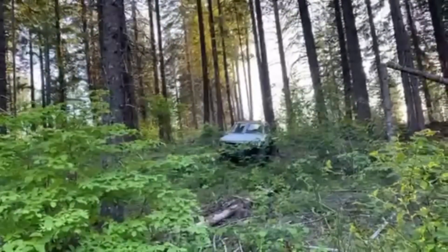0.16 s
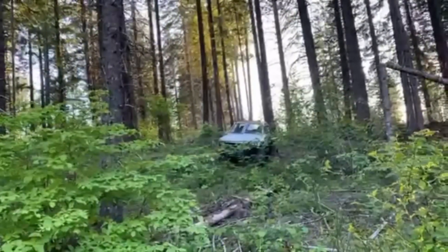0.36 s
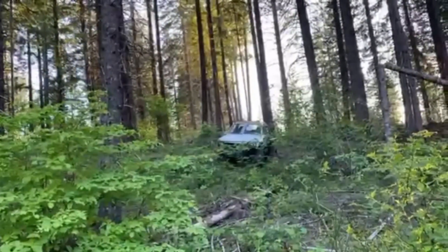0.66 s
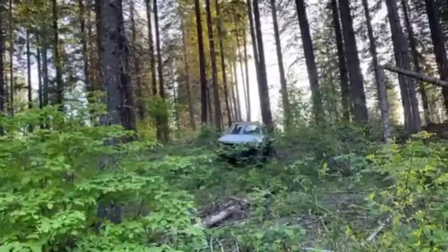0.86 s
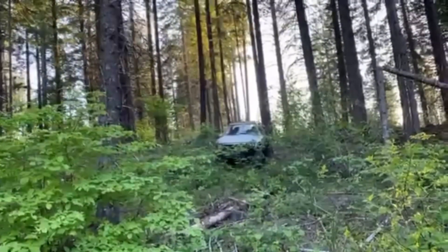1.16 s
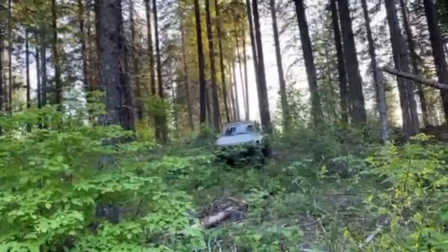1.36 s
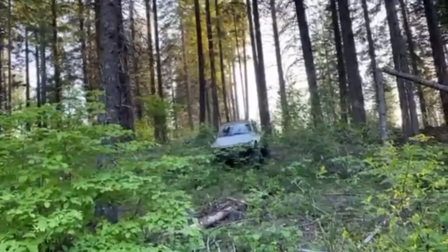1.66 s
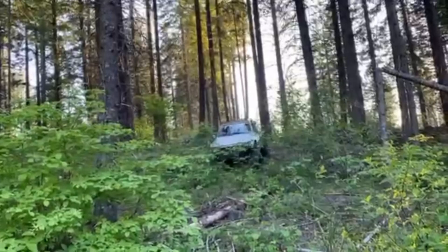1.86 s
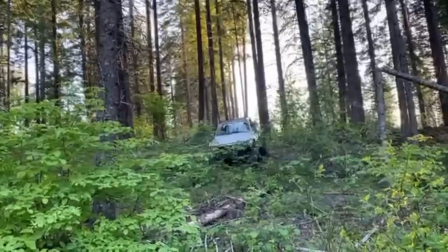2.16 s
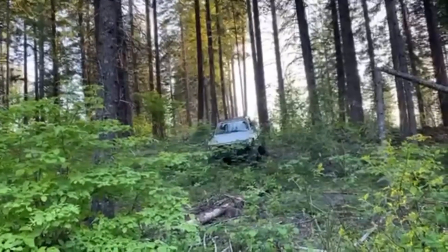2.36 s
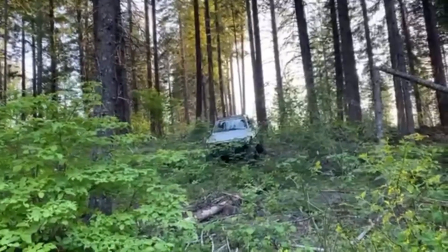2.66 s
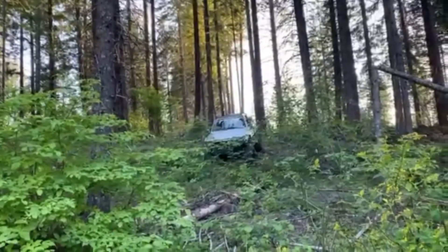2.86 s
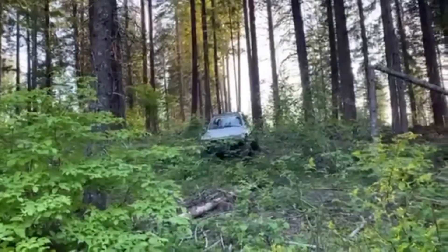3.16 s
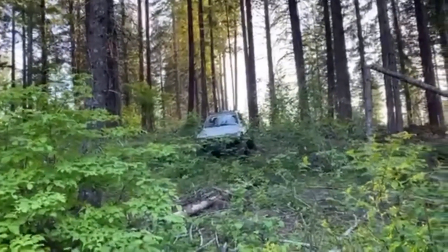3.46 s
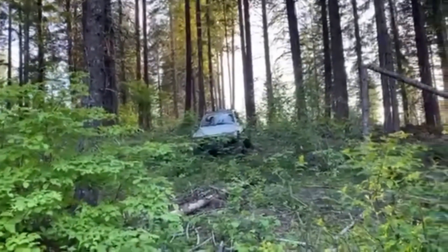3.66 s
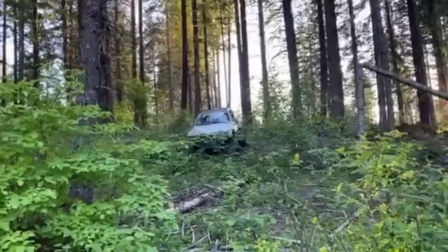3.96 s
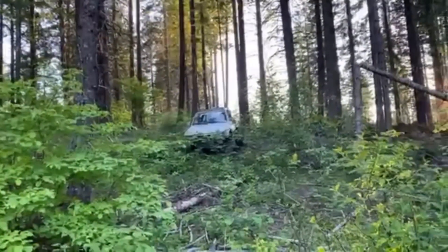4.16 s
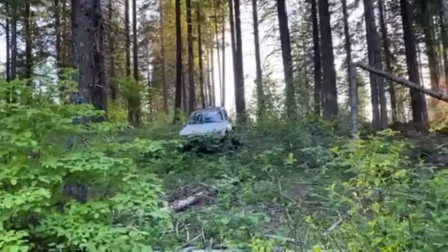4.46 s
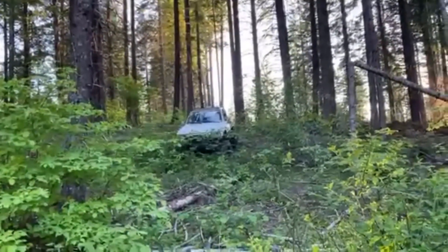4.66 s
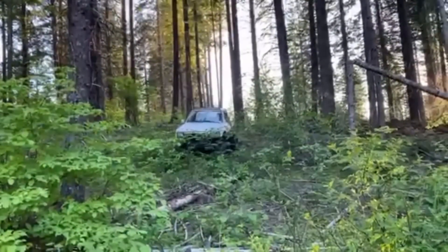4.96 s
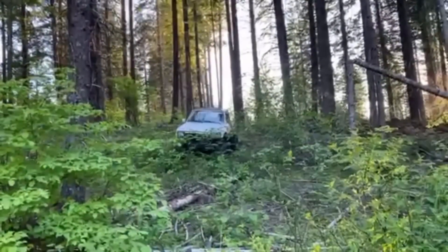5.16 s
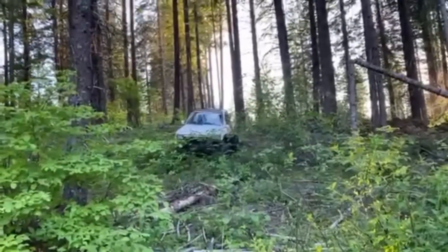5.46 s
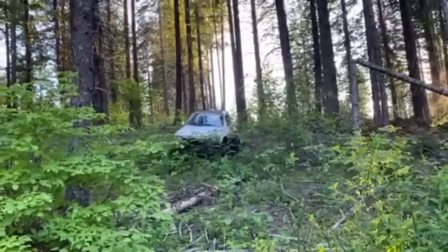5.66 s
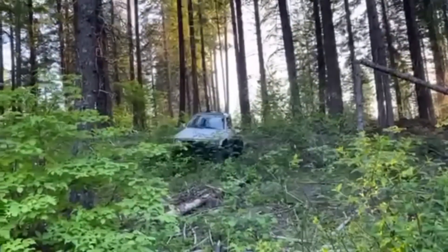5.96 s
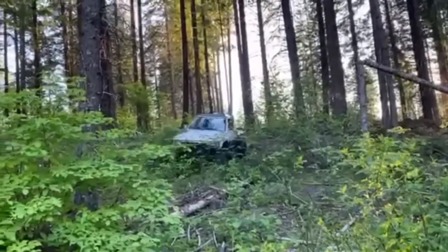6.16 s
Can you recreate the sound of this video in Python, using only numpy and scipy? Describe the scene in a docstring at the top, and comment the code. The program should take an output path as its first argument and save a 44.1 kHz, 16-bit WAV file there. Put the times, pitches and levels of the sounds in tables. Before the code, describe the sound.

Two engines throb in a forest, one revving in bursts, while branches snap and leaves swish under a slowly crawling off-road vehicle.

```python
"""Two engines throb in a conifer forest: a four-cylinder off-roader idles, then revs three times as it
crawls over brush, while a second engine hunts at low speed nearby. Each is a train of firing pulses
filtered by a resonant exhaust, over mechanical clatter and an airy hiss that pulse with the firings.
Under the tyres twigs crackle, branches snap and logs knock: brief impulses that excite the wood.
The trunks scatter it all into a thin reverberation."""
import sys
import numpy as np
from scipy import signal
from scipy.fft import rfft, irfft, next_fast_len
from scipy.io import wavfile
from scipy.ndimage import map_coordinates

SR = 44100
rng = np.random.default_rng(int(sys.argv[2]) if len(sys.argv) > 2 else 0)


def put_to_file(sound):
    """Save the sound as 16-bit audio at rate SR, in the file named by the first command-line argument."""
    columns = np.atleast_2d(sound).T  # one column per channel
    safe = np.clip(columns, -1, 1)
    whole_steps = np.round(safe * 32767)
    wavfile.write(sys.argv[1], SR, whole_steps.astype(np.int16))


N = 277461
TIME = np.arange(N) / SR
TOP_HZ = 15500
REV_CRUISE_HZ, SLOW_CRUISE_HZ = 70, 45  # firing rates at which the base levels hold
LOAD, VOICE, RUSH = 0, 1, 2  # effects of a throttle press: load, bark or growl, rush


# speed of the off-roader's engine: (time [s], firing rate [Hz])
REV_SPEED = [(0, 64.1), (2.37, 64.02), (2.5, 81.3), (2.59, 85.4), (3.13, 70.53), (3.59, 69.6),
             (3.72, 83.95), (3.858, 95.7), (4.03, 83.8), (4.31, 60.27), (4.69, 78.36), (4.92, 82.8),
             (5.15, 83.9), (5.36, 81.46), (5.671, 68.95), (5.82, 66), (5.922, 67.97), (6.102, 58.9)]
# its throttle: (time [s], held [s], load [1 = firm], added bark [dB], added rush [dB])
PRESSES = [(2.36, 0.17, 0.83, 13, 19), (3.61, 0.15, 1.05, 15.5, 20), (4.041, .17, .55, 3, 0),
           (4.348, .34, 0.88, 11.5, 19.5), (4.57, 1.06, 1.12, 14.5, 21.5), (5.66, .22, 1.56, 11.5, 17.5)]
# exhaust response for its round note, off throttle: (frequency [Hz], level [dB])
NOTE = [(58, -27.5), (64, -26.5), (68, -22.5), (78, -17.5), (84, -16), (95, -14.5), (118, -27.5),
        (128, -28), (145, -25.5), (166, -31), (182, -37)]
# exhaust response for its bark: (frequency [Hz], relative level [dB])
BARK = [(180, 15), (245, -0.5), (330, 3), (415, 7), (500, -6), (585, -9), (700, -1), (830, -1.5),
        (1000, -13.5), (1500, -44)]

def revving_engine():
    """Forced vibration: firings drive the exhaust pipe, and load lifts the upper harmonics to a bark."""
    hz, = curves(REV_SPEED)
    phase = crank(hz)
    load = throttle(PRESSES, LOAD, attack_s=0.051, release_s=0.088)
    first = response(NOTE, hz) * undb(6.5 * load)
    second = response(NOTE, 2 * hz) * undb(2 * load)
    note = np.sqrt(2) * (first * np.sin(2 * np.pi * phase) + second * np.sin(4 * np.pi * phase))
    # unequal cylinders add faint sidebands between the harmonics
    imbalance = np.sin(np.pi * phase / 2) + 0.15 * np.sin(np.pi * phase)
    push_db = throttle(PRESSES, VOICE, attack_s=0.028, release_s=0.073)
    bark_db = -46.5 - 0.0316 * (hz - REV_CRUISE_HZ) + push_db
    bark = undb(bark_db) * harmonics(phase, hz, BARK, scatter=0.17, evenness=0.94, first=3, count=14)
    note *= 1 + 0.025 * imbalance + 0.055 * walk(40)
    bark *= 1 + 0.027 * imbalance + 0.15 * walk(70)
    return note + bark, phase


# speed of the slow engine: (time [s], firing rate [Hz])
SLOW_SPEED = [(0, 30.3), (0.119, 30.35), (.4, 45.12), (.7, 48.45), (0.858, 41.4), (1.059, 42.35),
              (1.19, 29.98), (1.41, 27.38), (1.5, 39.07), (1.629, 50.5), (1.82, 55.42), (2.2, 53.8),
              (2.949, 44.8), (3.139, 50.55), (3.4, 45.68), (3.651, 36.48), (4.03, 32), (4.25, 41.9),
              (4.42, 34.8), (6.29, 34.01)]
# swell of its boom and mechanical noise: (time [s], gain [dB])
SLOW_LEVEL = [(0, -5.5), (.78, 0), (1.24, 2), (1.52, 0), (2.15, 2.5), (3.05, 0), (3.38, -1), (3.85, -7.5),
              (4.25, -2.5), (4.8, -5.5), (5.85, -13), (6.29, -6)]
# its throttle: (time [s], held [s], load [1 = firm], added growl [dB])
DABS = [(.19, 0.091, 1.17, 10.5), (.87, 0.18, 0.55, 14), (1.43, 0.2, 0.68, 11.5), (2.45, .4, 0.04, 3.5),
        (2.97, 0.084, 0.37, 8), (3.15, 0.29, 0.026, 6), (4.2, .12, 0.7, 1), (5.45, 0.89, 1.08, 1)]
# response of its silencer: (frequency [Hz], relative level [dB])
BOOM = [(28, -24), (42, -10), (48, -7.5), (56, 10), (80, -5.5), (100, -9.5), (116, 0), (135, -11.5),
        (165, -21.5), (210, -64)]
# response of its pipe: (frequency [Hz], relative level [dB])
GROWL = [(120, -52), (165, -7.5), (208, 6.5), (238, 0), (280, -20.5), (330, -20), (400, -21.5), (600, -10),
         (900, -22.5)]

def slow_engine():
    """Resonance: harmonics boom as they cross the silencer's peaks; the pipe growls under throttle."""
    hz, = curves(SLOW_SPEED)
    level_db, = curves(SLOW_LEVEL)
    phase = crank(hz)
    boom_db = -22.5 + level_db + 8 * throttle(DABS, LOAD, attack_s=0.018, release_s=0.054)
    push_db = throttle(DABS, VOICE, attack_s=0.038, release_s=0.072)
    growl_db = -43 + 0.16 * (hz - SLOW_CRUISE_HZ) + push_db
    boom = undb(boom_db) * harmonics(phase, hz, BOOM, scatter=0.21, evenness=0.46, first=1, count=6)
    growl = undb(growl_db) * harmonics(phase, hz, GROWL, scatter=0.29, evenness=1, first=3, count=16)
    return boom * undb(0.24 * walk(35)) + growl * undb(2.85 * walk(45)), phase


# spectrum of the dull clatter: (frequency [Hz], relative density [dB])
CLATTER = [(150, 1.5), (300, -5), (440, -2), (560, 2.5), (740, 3), (950, -4), (1250, -11), (1450, -13),
           (2500, -32.5), (6000, -29)]
# spectrum of the bright rattle: (frequency [Hz], relative density [dB])
RATTLE = [(900, -15), (1250, 3.5), (1480, -6), (1800, 0.5), (2020, -8), (2380, 3.5), (2650, -17),
          (3500, -14.5), (4600, -8), (7000, -33)]

def running_gear(rev_phase, slow_phase):
    """Amplitude modulation: the noise of gas and valves pulses in step with the firings."""
    both = pulsation(rev_phase, sharpness=0.22) * pulsation(slow_phase, sharpness=0.12)
    slow = pulsation(slow_phase, sharpness=0.21)
    clatter = colour(rng.standard_normal(N) * both * undb(1.2 * walk(30)), CLATTER)
    rattle = colour(rng.standard_normal(N) * slow * undb(2.5 * walk(50)), RATTLE)
    clatter *= effort(rev_law=(-42, 0.21, 6.9), slow_law=(-42.5, 0.25, 0.83))
    rattle *= effort(rev_law=(-60.5, 0.57, 4), slow_law=(-49, 0.19, 3))
    return clatter + rattle


def effort(rev_law, slow_law):
    """Incoherent sources add in power; each engine's noise grows with its speed and load."""
    def gain(speed, cruise_hz, presses, base_db, db_per_hz, load_db):
        hz, = curves(speed)
        load = throttle(presses, LOAD, attack_s=0.3, release_s=0.2)
        return undb(base_db + db_per_hz * (hz - cruise_hz) + load_db * load)
    level_db, = curves(SLOW_LEVEL)
    return np.hypot(gain(REV_SPEED, REV_CRUISE_HZ, PRESSES, *rev_law),
                    gain(SLOW_SPEED, SLOW_CRUISE_HZ, DABS, *slow_law) * undb(level_db))


# leaves brushing the body: (time [s], level [dB])
BRUSHING = [(0, -62), (.72, -54), (.95, -48), (1.45, -46), (1.9, -49.5), (2.35, -46.5), (3.0, -54.5),
            (4.25, -52.5), (5.4, -43), (5.9, -43.5), (6.29, -48)]
# spectrum of the hiss: (frequency [Hz], relative density [dB])
HISS = [(300, 12.5), (1300, 3.5), (2000, 2.5), (2900, 3.5), (4000, 5.5), (4900, 3.5), (5600, -3.5),
        (6300, 3), (7600, 3.5), (11000, -1.5), (15000, -10), (16000, -26)]

def hiss(rev_phase):
    """Broadband noise: brushing leaves add in power to the rush of fan and tyres under throttle."""
    brushing_db, = curves(BRUSHING)
    rush_db = -58.5 + throttle(PRESSES, RUSH, attack_s=0.011, release_s=0.29)
    noise = rng.standard_normal(N) * pulsation(rev_phase, sharpness=0.23) * undb(2.37 * walk(60))
    return colour(noise, HISS) * np.hypot(undb(brushing_db), undb(rush_db))


# breaks: (time [s], relative ring level [dB], ring frequency [Hz], relative crack level [dB])
SNAPS = [(0.2407, -69, 2150, -53.5), (1.158, -40.5, 6360, -49), (1.5544, -44, 4480, -46),
         (1.7318, -36, 4505, -43.5), (2.388, -36.5, 1692, -47), (2.5294, -31.5, 4570, -54),
         (2.7923, -31.5, 3486, -49), (2.834, -36, 4780, -57), (2.849, -33.5, 4500, -52),
         (2.9211, -32, 1883, -46), (3.1212, -29, 3010, -61), (3.3987, -24, 1718, -56),
         (3.5517, -41, 4500, -46), (3.5748, -27, 2017, -52), (3.576, -24.5, 3900, -45),
         (3.723, -34, 1960, -35.5), (3.8786, -34, 3930, -58), (4.337, -38, 4100, -47),
         (4.3689, -30.5, 4320, -43), (4.4411, -34, 3774, -61), (4.6108, -34, 2040, -60),
         (4.638, -30, 1829, -44), (4.8216, -25.5, 2560, -39), (4.826, -24, 1353, -44),
         (5.0393, -27.5, 6270, -49.5), (5.3566, -34, 4320, -44), (5.6229, -27.5, 5586, -31.5),
         (5.6335, -28.5, 3862, -44), (5.8165, -25.5, 4450, -42), (5.9478, -31.5, 3767, -44),
         (5.9624, -31, 2047, -36.5), (6.0023, -48.5, 4535, -39.5), (6.1217, -31, 6580, -46)]
# modes of a stick: (frequency [multiple of the ring frequency], relative level [dB])
STICK_MODES = [(.55, 5.5), (1, 14), (1.35, 7), (1.95, -3), (2.65, -6)]

def branches(crack_s, tear_s, mode_q, rustle_s, rustle_db, ring_gain_db, crack_gain_db):
    """Impulse excitation: tearing fibres crack and ring the stick's modes; a faint rustle follows."""
    t = TIME[:4096]
    out = np.zeros(N + len(t))
    thin = signal.butter(4, 1100, "high", fs=SR, output="sos")  # a thin stick radiates no bass
    bright = signal.butter(2, [5500, 14500], "band", fs=SR, output="sos")
    rise = (1 - np.exp(-t / 0.00042)) ** 2
    rustle = undb(rustle_db) * np.exp(-t / rustle_s)
    for s, ring_db, hz, crack_db in SNAPS:
        fibres, wood = rng.choice([-1, 1], (2, len(t)))
        crack = signal.sosfilt(bright, fibres * rise * (np.exp(-t / crack_s) + rustle))
        tear = wood * rise * (np.exp(-t / tear_s) + rustle)
        modes = sum(undb(db) * resonate(tear, min(hz * k, TOP_HZ), mode_q) for k, db in STICK_MODES)
        ring = undb(ring_db + ring_gain_db) * unit(signal.sosfilt(thin, modes))
        start = int(s * SR)
        out[start:start + len(t)] += ring + undb(crack_db + crack_gain_db) * unit(crack)
    return out[:N]


# wheels striking logs: (time [s], relative level [dB], frequency [Hz])
KNOCKS = [(0.324, -23, 570), (1.479, -20, 660), (2.457, -23, 471), (4.823, -15, 484), (5.809, -15, 683.4)]

def logs(ring_s, gain_db):
    """Damped oscillation: a thick log answers a blow with one short, low ring."""
    out = 0
    for s, db, hz in KNOCKS:
        t = np.maximum(TIME - s, 0)
        envelope = np.exp(-t / ring_s) - np.exp(-t / 0.00037)
        out = out + undb(db + gain_db) * np.sin(2 * np.pi * hz * t) * envelope
    return out


def twigs(per_second, spread_db, gain_db):
    """Shot noise: crushed twigs crack in random clusters, louder with the brushing and the load."""
    brushing_db, = curves(BRUSHING)
    push_db = 2.5 * throttle(PRESSES, LOAD, attack_s=0.03, release_s=0.09)
    chance, size, sign = rng.random(N), rng.exponential(size=N), rng.choice([-1, 1], N)
    rate = per_second * undb(4 * walk(4))
    impulses = (chance < rate / SR) * undb(spread_db * np.minimum(size, 2.5))
    splinters = sign * signal.fftconvolve(impulses, np.exp(-TIME[:256] / 0.0005))[:N]
    crackle = colour(splinters, [(2000, 1), (4500, 3), (11500, -2.5), (15500, -7)])
    return crackle * undb(brushing_db + push_db + gain_db)


# leafy twigs scraping the body: (time [s], half-length [s], centre frequency [Hz], level [dB])
SWISHES = [(.95, 0.052, 6740, -46), (1.06, 0.023, 5447, -48), (1.22, 0.079, 4700, -49),
           (1.417, 0.022, 6200, -48), (1.518, 0.027, 5900, -50), (2.43, 0.053, 6260, -40.5),
           (3.66, 0.057, 6540, -45)]
# wood crunching under the tyres: (time [s], half-length [s], centre frequency [Hz], level [dB])
CRUNCHES = [(2.48, 0.033, 1890, -36), (4.625, 0.014, 1540, -33), (5.15, .04, 1898, -42),
            (5.8, 0.086, 759.6, -30.5), (5.82, 0.018, 3787, -36.5)]

def rubbing(rubs, q, grain_db):
    """Friction noise: each rub of leaves or wood is a short, grainy swell in its own band."""
    out = 0
    for s, half_s, hz, db in rubs:
        grains = rng.standard_normal(N) * undb(grain_db * walk(150))
        out = out + resonate(grains, hz, q) * undb(db) * np.exp(-((TIME - s) / half_s) ** 2)
    return out


def trunks(x, t60_s, wet_db):
    """Multiple scattering: tree trunks add a thin, decaying tail of middle and treble."""
    t = TIME[:SR]
    tail = rng.standard_normal(SR) * undb(-60 * t / t60_s) * (1 - np.exp(-t / 0.0081))
    band = signal.butter(1, [400, 5000], "band", fs=SR, output="sos")
    tail = signal.sosfilt(band, tail / np.linalg.norm(tail))
    return x + undb(wet_db) * signal.fftconvolve(x, tail)[:N]


# spectrum of the forest air: (frequency [Hz], relative density [dB])
AIR = [(20, -31), (35, -13), (80, 9), (160, 0), (300, -40), (1000, -27.5), (4000, -34.5), (15000, -56)]

def forest_air(level_db):
    """Stationary noise: a low, steady rumble lies under everything."""
    return undb(level_db) * colour(rng.standard_normal(N), AIR)


def throttle(presses, effect, attack_s, release_s):
    """First-order lag: an effect builds while the pedal is down, then decays; the strongest rules."""
    out = 0
    for s, held, *effects in presses:
        rise = 1 - np.exp(-np.clip(TIME - s, 0, held) / attack_s)
        fall = np.exp(-np.maximum(TIME - s - held, 0) / release_s)
        out = np.maximum(out, effects[effect] * rise * fall)
    return out


def crank(hz):
    """Phase [cycles] is the integral of firing rate; the crank turns slightly unevenly."""
    return np.cumsum(hz) / SR + 0.007 * walk(18)


def harmonics(phase, hz, spectrum, scatter, evenness, first, count):
    """Fourier series of pulses in a pipe; scatter [cycles] smears them, evenness 1 levels the power."""
    out, power = 0, 0
    for k in range(first, first + count):
        gain = response(spectrum, k * hz[::64]).repeat(64)[:N]
        out = out + gain * np.cos(2 * np.pi * (k * phase + scatter * rng.standard_normal()))
        power = power + gain ** 2 / 2
    return out / np.sqrt(power) ** evenness


def pulsation(phase, sharpness):
    """Periodic envelope: one swell for each firing."""
    return unit(np.exp(sharpness * np.cos(2 * np.pi * phase)))


def resonate(x, hz, q):
    """Second-order resonance of bandwidth hz / q, at rms 1."""
    return unit(signal.lfilter(*signal.iirpeak(hz, q, SR), x))


def response(spectrum, hz):
    """Frequency response as a gain, falling 20 dB per octave beyond the table's ends."""
    table_hz, db = np.transpose(spectrum)
    octaves, at = np.log2(table_hz), np.log2(np.maximum(hz, 1))
    outside = np.abs(at - np.clip(at, octaves[0], octaves[-1]))
    return undb(np.interp(at, octaves, db) - 20 * outside)


def colour(x, spectrum):
    """Linear filtering by a spectrum, at rms 1."""
    size = next_fast_len(N)
    gain = response(spectrum, np.fft.rfftfreq(size, 1 / SR))
    return unit(irfft(rfft(x, size) * gain, size)[:N])


def walk(rate_hz):
    """Smooth random fluctuation of spread near 1."""
    knots = rng.standard_normal(4096)
    return map_coordinates(knots, [TIME[::32] * rate_hz], order=3, mode="wrap").repeat(32)[:N]


def curves(table):
    """Linear interpolation of each column over time."""
    s, *columns = np.transpose(table)
    return [np.interp(TIME, s, column) for column in columns]


def undb(db):
    """Decibels to amplitude ratio."""
    return 10 ** (np.asarray(db) / 20)


def unit(x):
    """Normalisation to rms 1."""
    return x / np.sqrt(np.mean(x ** 2))


def scene():
    """Superposition: engines, running gear and breaking wood sum among the trees."""
    revving, rev_phase = revving_engine()
    slow, slow_phase = slow_engine()
    brush = rubbing(SWISHES, q=8.33, grain_db=4.5) + twigs(per_second=70, spread_db=7, gain_db=-6.5)
    snaps = branches(crack_s=0.00032, tear_s=0.00074, mode_q=4.17, rustle_s=0.014, rustle_db=-33,
                     ring_gain_db=-12.5, crack_gain_db=-1.5)
    crunch = rubbing(CRUNCHES, q=2.5, grain_db=4)
    knocks = logs(ring_s=0.0042, gain_db=-5)
    machines = revving + slow + running_gear(rev_phase, slow_phase) + hiss(rev_phase)
    direct = machines + brush + snaps + crunch + knocks
    air = forest_air(level_db=-32.5)
    return (trunks(direct, t60_s=0.61, wet_db=-13) + air)[None]


# notches of the microphone: (frequency [Hz], bandwidth [Hz])
NOTCHES = [(8930, 3380), (13250, 2170)]

def record(dry):
    """Band limiting: the microphone notches the treble, and a steep low-pass cuts the top."""
    for hz, width in NOTCHES:
        dry = signal.lfilter(*signal.iirnotch(hz, hz / width, SR), dry)
    return signal.sosfilt(signal.ellip(8, 0.2, 70, TOP_HZ, fs=SR, output="sos"), dry)


dry = scene()
out = record(dry)
put_to_file(out)
```